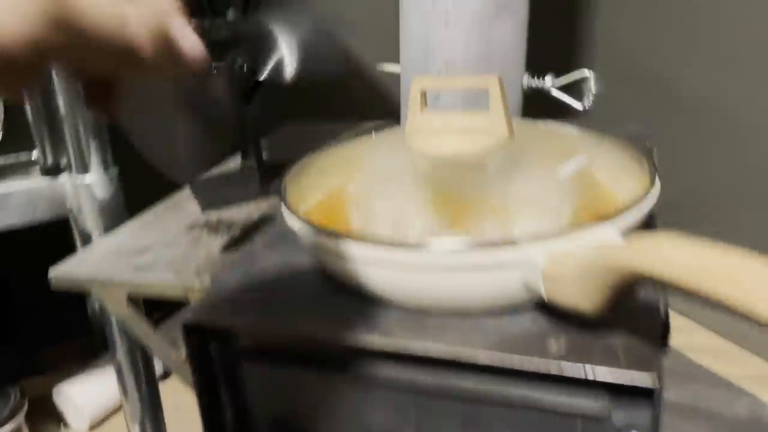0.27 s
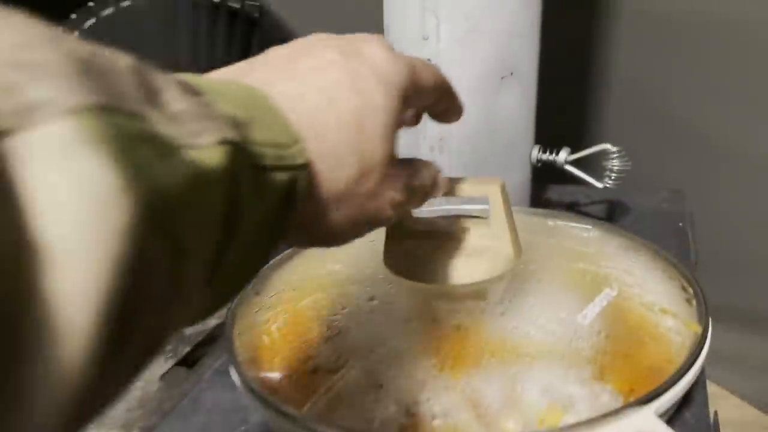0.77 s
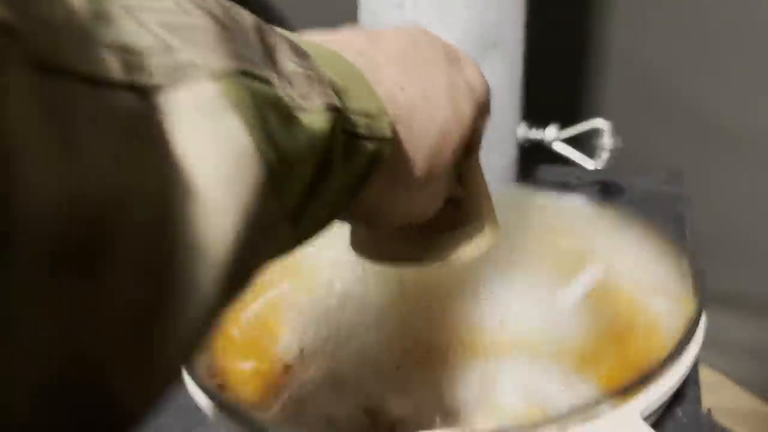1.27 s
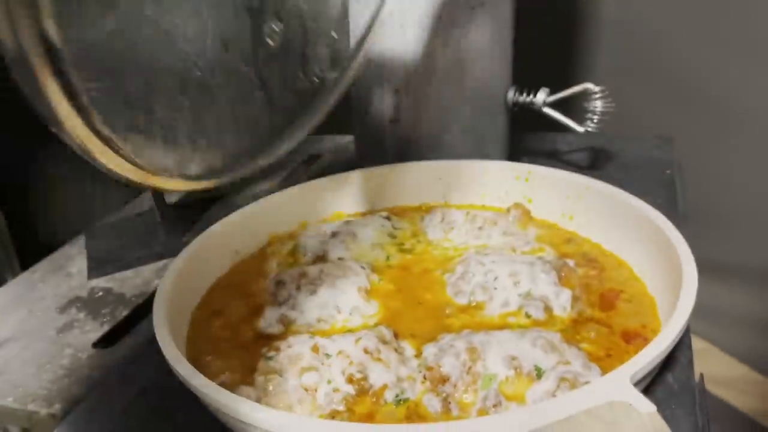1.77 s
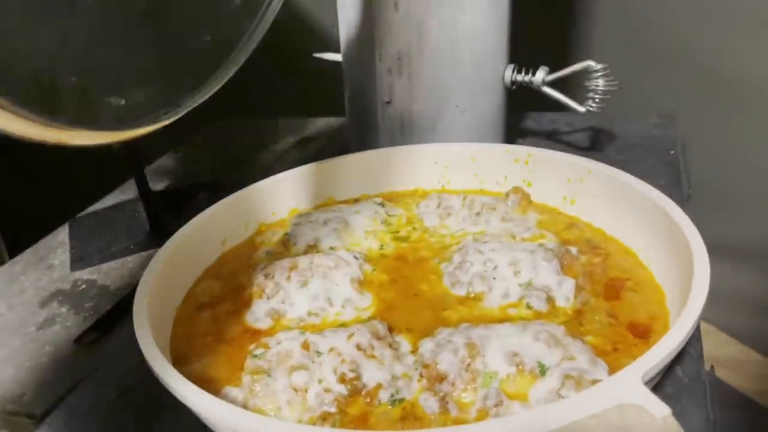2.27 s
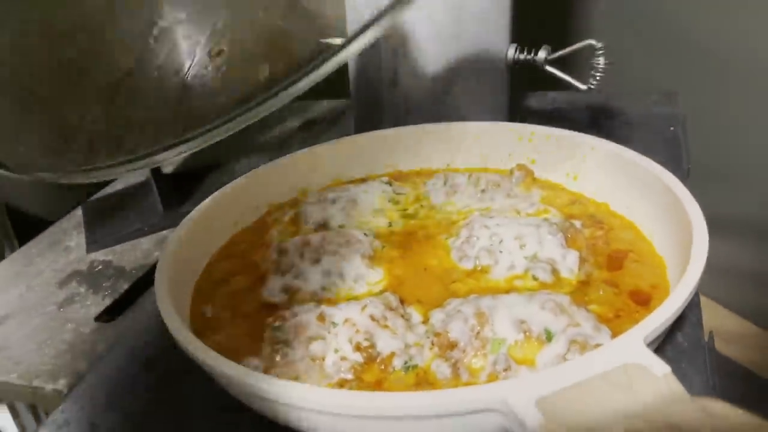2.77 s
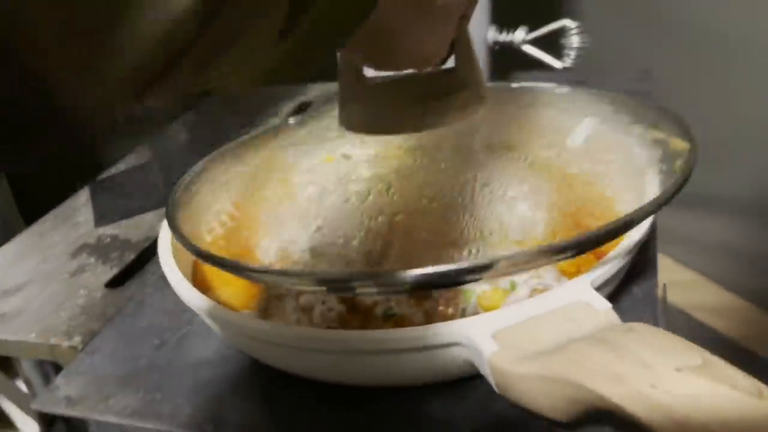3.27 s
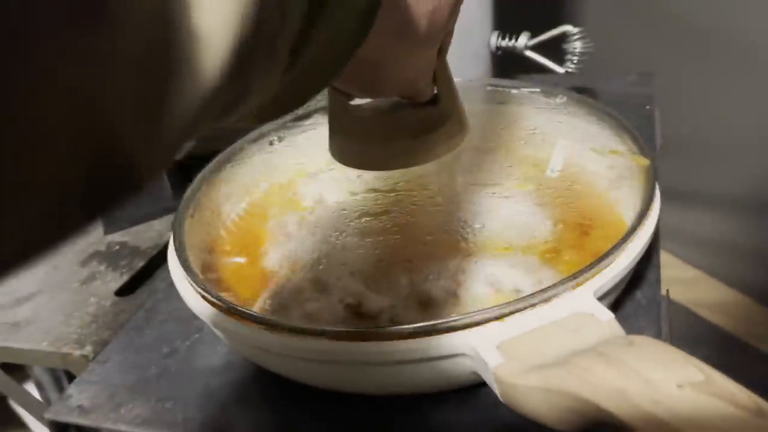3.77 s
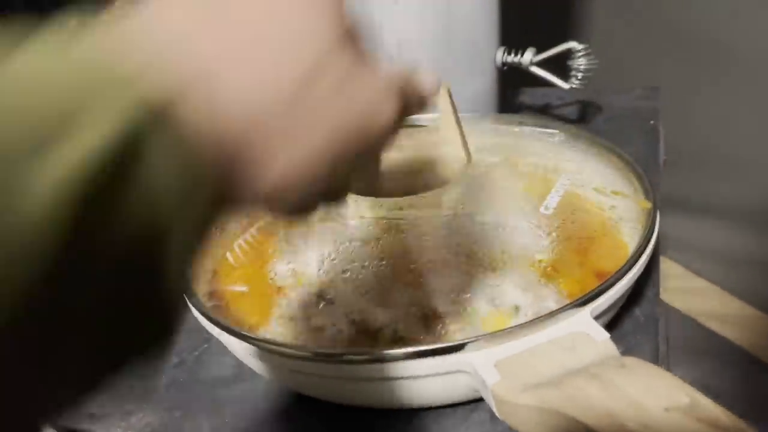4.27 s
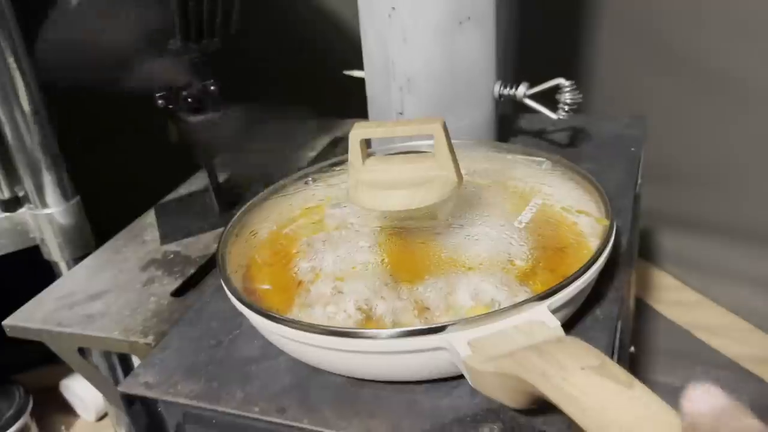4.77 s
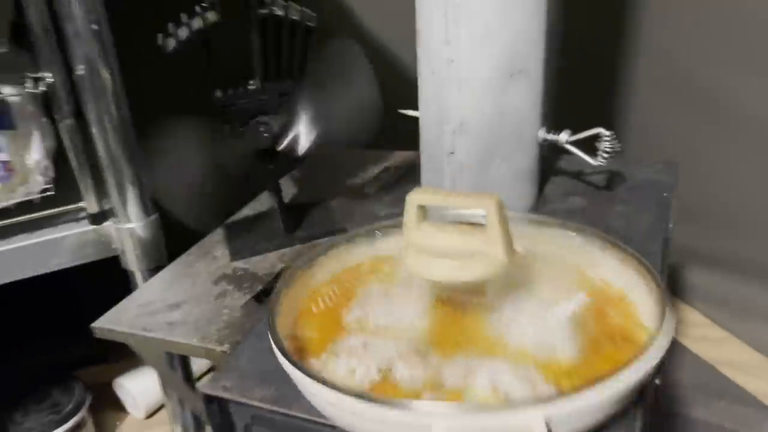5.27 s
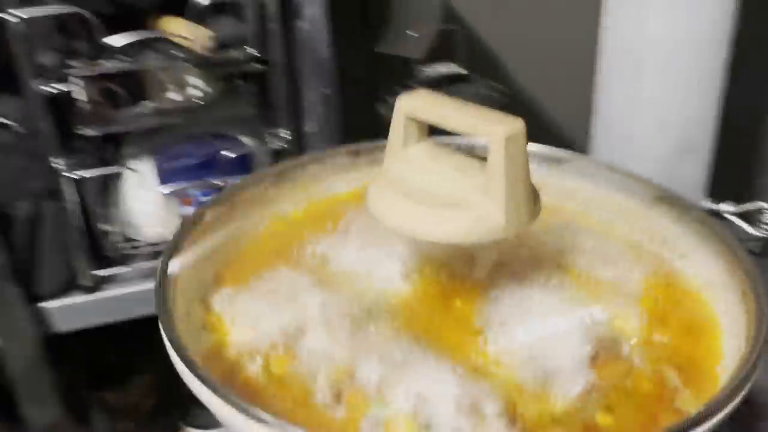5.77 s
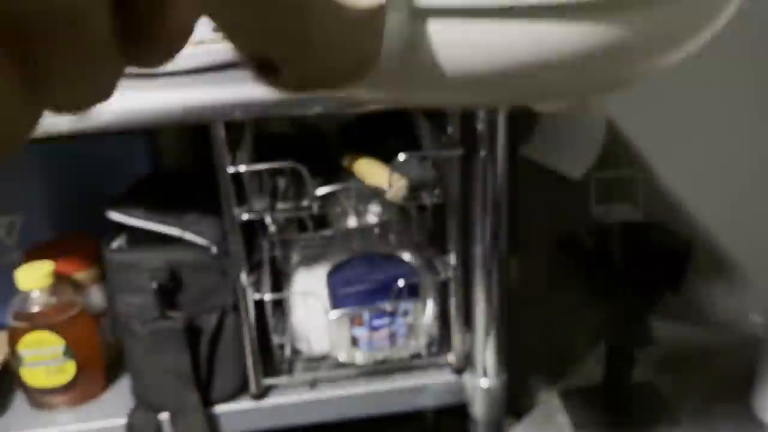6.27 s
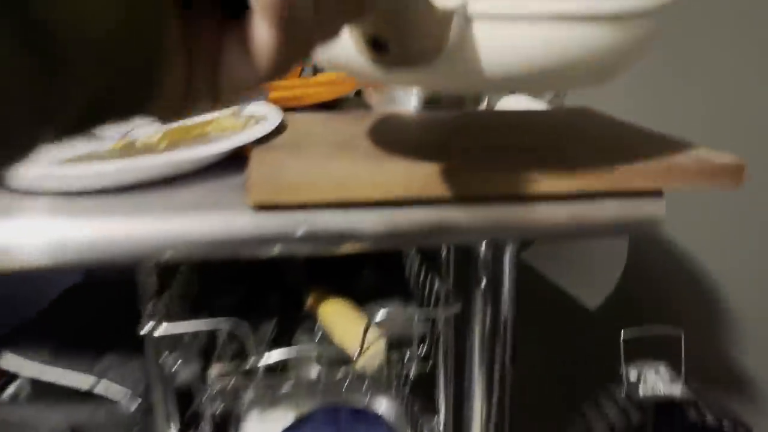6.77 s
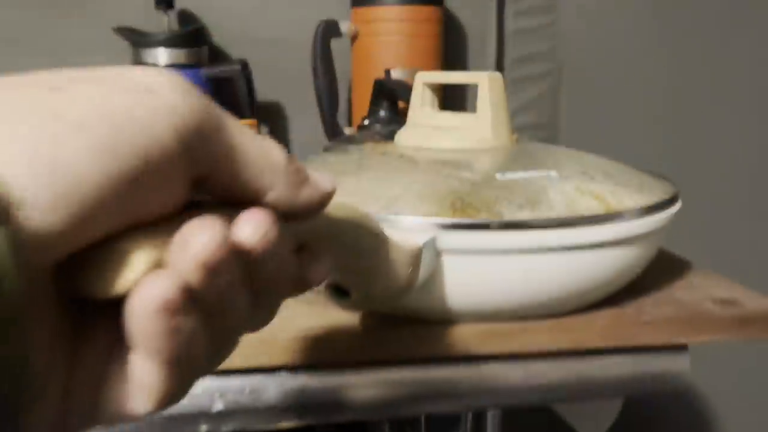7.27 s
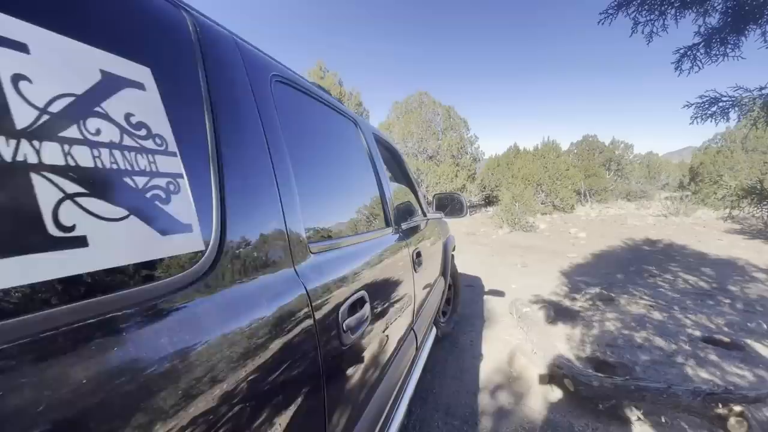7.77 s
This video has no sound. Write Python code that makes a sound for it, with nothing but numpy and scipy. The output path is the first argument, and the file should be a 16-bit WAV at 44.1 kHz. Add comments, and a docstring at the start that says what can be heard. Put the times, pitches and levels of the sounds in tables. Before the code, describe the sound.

In a small, close room, food sizzles faintly in a covered pan. The glass lid lifts with a soft rub and crisp bubbles pop and crackle. The lid scrapes and knocks back into place, the pan slides briefly off a metal stove, and lands hard on a wooden board. A hard cut leads outdoors to a steady idling engine close by.

```python
"""A small room with a stove: eggs sizzle in a pan as steam hiss and bursting bubbles. A hand lifts the
glass lid, sets it back with knocks and rubs, slides the pan off the stove and sets it down hard on a board.
Blows ring tables of modes; rubbing is uneven friction on resonances. An abrupt cut then leads outdoors, beside
an idling engine: exhaust pulses and a beating accessory hum as steady tones, a throbbing roar and valve taps."""
import sys
import numpy as np
from scipy import signal
from scipy.fft import rfft, irfft, next_fast_len
from scipy.io import wavfile
from scipy.ndimage import uniform_filter1d

SR = 44100
rng = np.random.default_rng(int(sys.argv[2]) if len(sys.argv) > 2 else 0)


def log_audio(samples):
    """Write samples as a 16-bit WAV file to the path given in sys.argv[1]."""
    # one column per channel
    frames = np.atleast_2d(samples).T
    # limit to full scale, then quantise
    limited = np.clip(frames, -1, 1)
    pcm = np.round(limited * 32767).astype(np.int16)
    wavfile.write(sys.argv[1], SR, pcm)


N = 353946

# spectrum of the steam hiss: pitch_hz [Hz], level_db [dB per Hz]
HISS_SPECTRUM = [(880, -46.5), (1500, -13), (2360, -5), (2750, -6.5), (4020, -18.5), (4810, -9.5),
                 (8350, -2), (9310, -3.5), (10400, -10), (11400, -6), (13000, -58.5)]
# left-right likeness of the hiss: pitch_hz [Hz], likeness [0-1]
HISS_LIKENESS = [(60, 0.93), (180, 0.94), (550, 0.81), (1650, 0.7), (4970, 0.079), (15000, 0.5)]
# the largest bursting bubbles: start_s [s], level_db [dB], pitch_hz [Hz], left_right_db [dB]
LARGE_POPS = [(1.259, -38.5, 8400, 4), (1.2982, -30.5, 6600, 12), (1.377, -20.5, 4900, 2),
              (1.384, -34, 3050, -2), (1.399, -35, 4450, -1), (1.415, -29, 5800, 3), (1.438, -29, 9050, 2),
              (1.4587, -34.5, 4530, 1), (1.468, -35, 8300, 0.5), (1.4832, -28.5, 9200, -5),
              (1.4828, -36, 5270, 3), (1.507, -40, 5400, 2), (1.5314, -31, 9250, -8),
              (1.6384, -33.5, 8000, 3), (1.63, -47, 3150, 1), (1.7095, -40, 6230, 2.5),
              (1.711, -33, 9250, -1), (1.716, -41, 2960, 1), (1.728, -35.5, 6900, 2),
              (1.7467, -39, 5860, 2), (1.759, -38, 3100, 0.5), (1.8693, -41, 2820, 1),
              (1.8802, -38, 4380, 1.5), (1.943, -34, 8500, 2), (1.954, -45, 4300, 1),
              (1.8425, -33, 8200, 4), (1.9213, -29, 7400, 3), (2.0165, -35, 7300, 4),
              (1.6495, -34, 8700, 1), (1.609, -36, 8800, 1), (1.852, -35, 8800, 2), (1.869, -46, 5000, 1),
              (2.0655, -39, 6500, 2), (2.571, -36, 7600, 2), (2.585, -40, 2980, 1), (2.606, -40, 2700, 1),
              (2.626, -37, 7500, 2), (2.752, -35, 4500, 2), (2.792, -37, 3400, 1), (1.42, -29, 9200, 2),
              (1.423, -37, 4900, 1), (2.0154, -41, 4770, 2), (2.0359, -39.5, 3230, 2),
              (2.0797, -29.5, 8200, 2), (2.1977, -41, 4790, 14), (2.3237, -19, 4880, 5.5),
              (2.3925, -38, 2850, 0), (2.483, -26.5, 8100, 3), (2.3846, -37, 5800, 0.5),
              (2.502, -36, 5920, 4.5), (2.568, -36, 5840, 1.5), (2.522, -33, 5500, 9),
              (2.5943, -35, 4700, 5), (2.6634, -27.5, 7460, 3.5), (2.7023, -23, 5260, 6),
              (2.735, -28, 6200, 4), (2.7633, -18, 6350, 2), (2.807, -24.5, 7500, 4),
              (2.8313, -32, 8610, 4), (2.9817, -46, 5270, -0.5), (2.9997, -39.5, 3190, -3),
              (3.073, -36, 7700, 1.5), (3.1878, -33, 8910, 0), (3.2008, -33, 6000, 3),
              (3.3035, -37, 7650, 4)]
# steam squeaking out of a bubble: start_s [s], length_s [s], level_db [dB], from_hz [Hz], to_hz [Hz],
# left_right_db [dB]
STEAM_SQUEAKS = [(1.836, 0.0074, -43, 2800, 4930, 1), (2.002, 0.016, -39, 9600, 7000, 2),
                 (2.14, 0.011, -50, 1990, 5000, 1)]
# the lid starts to lift, is fully open, starts to close, is shut [s]
LID_S = (1.101, 1.45, 2.8, 3.5)
SHUT_DB, OPEN_DB = -60.5, -52.5  # sizzle under the shut and the open lid
WARMING_DB_PER_S, COOLING_DB_PER_S, COOLING_S = 1.5, -1.5, 3.74  # swell while open; the pan cools from 3.74 s
# the sizzle swells when the sauce is jolted: start_s of the peak [s], rise_db [dB]
SLOSHES = [(5.7, 3.6), (7.33, 10.9)]
SWELL_S, SETTLE_S = 0.16, 0.28
POP_CYCLES = 4.66  # time scale of a large pop, in cycles
POP_SNAP_DB, SNAP_GROWTH = -4, 0.13  # snap of a pop at -27 dB [dB], and its growth [dB per dB]


def sizzle():
    """Bubble acoustics: broadband steam noise, random and large bursts, and squeaks, as the lid opens and shuts."""
    t = np.arange(N) / SR
    gap = np.interp(t, LID_S, [0, 1, 1, 0])
    open_rise_db = OPEN_DB - SHUT_DB + WARMING_DB_PER_S * (t - LID_S[1])
    level_db = SHUT_DB + gap * open_rise_db + COOLING_DB_PER_S * np.maximum(t - COOLING_S, 0)
    slosh_db = sum(np.interp(t, [s - SWELL_S, s, s + SETTLE_S], [0, db, 0]) for s, db in SLOSHES)
    level = amp(level_db + slosh_db)
    hiss = noise(HISS_SPECTRUM, HISS_LIKENESS, patchy_db=2, flicker_db=1.5)
    opened = np.clip(.015 + 1.1 * gap ** 1.8, 0, 1)
    bubbles = crackle(opened) * level * amp(3.5)
    for s, db, hz, pan_db in LARGE_POPS:
        snap_db = POP_SNAP_DB + SNAP_GROWTH * (db + 27.0)
        add(bubbles, s, amp(db) * bubble(hz, POP_CYCLES, 0.028, snap_db), pan_db)
    for s, length, db, from_hz, to_hz, pan_db in STEAM_SQUEAKS:
        add(bubbles, s, amp(db) * squeak(length, from_hz, to_hz), pan_db)
    bubbles = band(bubbles, 1700, 16000)  # small bubbles radiate no bass
    steam = amp(-3.5 * opened)  # the hiss gives way to crackle as the lid opens
    return level * steam * hiss + bubbles + amp(-12) * walls(bubbles, .05, 10000)


def crackle(opened):
    """Random point process: bursts of 20 bubble kinds come in flurries, more densely as the lid opens."""
    clumps = amp(3.5 * evened(uniform_filter1d(rng.standard_normal(N), size=1500)))
    strength = amp(4.3 * np.minimum(rng.exponential(1, N), 3.4))
    bursts = strength * (rng.random(N) < 1100 * opened * clumps / SR)
    kind, out = rng.integers(0, 20, N), np.zeros((2, N))
    for k, (pitch, length, side) in enumerate(rng.random((20, 3))):
        hz = 1900 * 5.1 ** (((k + pitch) / 20) ** .5)
        grain = (hz / 9000) ** .9 * bubble(hz, 1 + 4 * length ** 3, glide=.06, snap_db=-5)
        add(out, 0, signal.oaconvolve(bursts * (kind == k), grain), 1.9 + 8 * (side - .5))
    return out


def bubble(hz, cycles, glide, snap_db):
    """Damped oscillator: a brief snap, and a short tone whose pitch rises when glide is positive."""
    t = np.arange(int(3 * cycles / hz * SR) + 40) / SR
    u = t * hz / cycles
    snap = np.exp(-t / .00022) * 1.3 * np.sin(2 * np.pi * .85 * hz * t)
    chirp = u * np.exp(1 - 2.31 * u) * 1.79 * np.sin(2 * np.pi * hz * t * (1 + glide * u))
    return chirp + amp(snap_db) * snap


def squeak(length, from_hz, to_hz):
    """Frequency modulation: a short unsteady whistle slides from one pitch to another."""
    u = np.arange(int(length * SR)) / (length * SR)
    jitter = 1 + .06 * evened(uniform_filter1d(rng.standard_normal(len(u)), size=60))
    hz = (from_hz + (to_hz - from_hz) * u) * jitter
    return np.sqrt(np.sin(np.pi * u)) * np.sin(2 * np.pi * np.cumsum(hz) / SR)


# blows on lid, stove and board: start_s [s], level_db [peak dB], thud_db and click_db [dB against the middle
# of the sound], ring [factor on the ring time], low_hz and middle_hz [Hz, favoured by the spot of contact]
LID_BLOWS = [(1.038, -41.5, -9, 1, 0.93, 190, 1060), (3.531, -22.5, 17, 15.5, 0.47, 290, 590),
             (3.553, -24.5, -11, 13, 1, 210, 760), (3.569, -24, -1, -5, 0.36, 190, 600),
             (3.82, -22.5, 4.5, -22, 0.44, 275, 520), (3.865, -20, 9.5, -4, 0.3, 330, 510),
             (3.888, -7, -1, -13.5, 0.35, 320, 560), (3.953, -17.5, 13, -4.5, 0.45, 250, 510),
             (3.971, -16.5, 17, -23, 0.58, 285, 780), (3.996, -11, -3, -13, 0.58, 255, 825),
             (4.029, -28.5, 1, -32, 0.98, 190, 800)]
STOVE_BLOWS = [(0.095, -40, 4, -26, 0.38, 190, 650), (0.892, -43, 25, 6, 0.2, 180, 530),
               (0.899, -39, 30, 5, 0.3, 99, 650), (1.149, -41, 24, 5, 0.32, 180, 650),
               (1.259, -36, 30, 15, 0.47, 270, 650), (3.549, -21, 31, -9.5, 0.41, 100, 650),
               (4.2815, -29.5, 8, -23, 0.26, 270, 650), (4.806, -17.5, 8, -10, 1, 268, 676),
               (4.852, -32.5, 24, -10, 0.29, 99.8, 701), (4.874, -33, 21, -10, 0.35, 100, 701),
               (5.063, -34, 18, -4, 0.13, 320, 650), (5.348, -28, 5, -7, 0.57, 310, 620),
               (5.354, -17, 9, -21, 0.28, 173, 520), (5.436, -42.5, -5, -19, 0.4, 270, 850),
               (5.505, -42, 28, 3, 0.48, 220, 647), (6.077, -45, 4, -6, 0.47, 270, 1020)]
PAN_ON_BOARD = [(7.1192, -4.5, -8, -4.5, 0.13, 375, 990), (7.1228, -3, -6.5, -9, 0.17, 190, 880),
                (7.1275, -7.5, -5, -17, 0.24, 160, 1010), (7.141, -7, 6.5, -2, 0.23, 190, 1000),
                (7.149, -12.5, 8, -13, 0.19, 350, 620), (7.163, -23, 6, -12, 0.3, 370, 650),
                (7.175, -25, 0, -9, 0.3, 290, 630), (7.185, -23.5, -5, -16, 0.33, 125, 1000),
                (7.194, -19, 2.5, -20, 0.19, 200, 970), (7.208, -22.5, -0.5, -17, 0.18, 380, 600),
                (7.226, -34, 8, -20, 0.28, 200, 630), (7.244, -37.5, 14, -10, 0.3, 170, 620),
                (7.286, -39, 17, -12, 0.18, 260, 860)]
# modes of the lid on the pan, the stove and the board: pitch_hz [Hz], level_db [dB], t60_s [s]
LID_MODES = [(71, -11, 0.5), (194, -5, 0.26), (258, 3.5, 0.11), (287, 7.5, 0.088), (324, 7, 0.093),
             (376, -7, 0.12), (507, -0.5, 0.12), (584, 1.5, 0.088), (760, -10, 0.16), (834, 7, 0.089),
             (1060, 6, 0.07), (1323, -8, 0.25), (1700, -5, 0.066), (1931, -11.5, 0.21), (2355, -16, 0.11),
             (2753, -9, 0.14), (3100, -10, 0.059), (3730, -2, 0.071), (4300, 0.5, 0.038),
             (5020, -6.5, 0.059), (8710, -6, .04)]
STOVE_MODES = [(75, -9, 0.2), (99, -1.5, 0.29), (179.5, 7, 0.13), (269, 8, 0.128), (322, -1.5, 0.083),
               (530, -1.5, 0.11), (653, -2, 0.14), (750, -3, 0.14), (850, -3, 0.08), (1020, -3, 0.082),
               (1430, -21, 0.06), (2300, -7, 0.04), (4400, -7, 0.046), (8100, -26, .04)]
BOARD_MODES = [(70.4, -19, 0.22), (121.2, -5, 0.3), (185, 4.5, 0.28), (290, -2, 0.2), (365, 3, 0.26),
               (500, -7.5, 0.2), (625, 1, 0.36), (885, -2, 0.2), (1005, 1, 0.31), (1270, -9.5, 0.15),
               (1560, -8, 0.15), (1830, -11, 0.2), (2165, -5.5, 0.12), (2356, -4.5, 0.16),
               (2440, -6.5, 0.16), (2750, -5, 0.12), (3200, -3.5, .12), (3420, -4, .12), (3770, -8, 0.1),
               (4460, -10.5, 0.1), (5000, -11, .1), (6220, 0, 0.1)]


def handling():
    """Impact and friction: blows ring the bodies, snaps add sharp pulses, and dragging and sliding sustain."""
    hits = blows(LID_BLOWS, LID_MODES, -8, 0.2, 0.74, upper_db=-1.5, share=0.37, pan_db=1.5)
    hits += blows(STOVE_BLOWS, STOVE_MODES, -7.0, 0.11, 0.95, upper_db=-1.0, share=0.37, pan_db=0.5)
    hits += blows(PAN_ON_BOARD, BOARD_MODES, 2.6, 0.21, 0.83, upper_db=6.5, share=0.59, pan_db=0.9)
    hits += snaps()
    rasp = rim_rasp()
    return band(hits, 55, 16000) + lid_drags(rasp) + pan_slide(rasp) + pan()


# the four bands of a blow: from_hz [Hz], to_hz [Hz], rise_s [s]
BLOW_BANDS = [(50, 500, .003), (500, 1300, .001), (1300, 3000, .0005), (3000, 10000, .0002)]
FAVOUR_DB_PER_OCTAVE = 9.5


def blows(rows, modes, crack_db, crack_s, spread, upper_db, share, pan_db):
    """Modal synthesis: each blow rings the modes with a noise crack; bass swells slower and is more alike."""
    out = np.zeros((2, N))
    for s, peak_db, thud_db, click_db, ring, *spots in rows:
        levels_db = thud_db, 0, upper_db + share * click_db, click_db
        phases, (a, b), sound = rng.random((len(modes), 2)), rng.standard_normal((2, 9000)), 0
        t = np.arange(min(9000, int(1500 + 11000 * ring))) / SR  # longer for a longer ring
        for db, (lo, hi, rise) in zip(levels_db, BLOW_BANDS):
            apart = spread * min(hi / 3200, 1)  # left-right phase spread
            tone = 0
            for (hz, mode_db, t60), (p, q) in zip(modes, phases):
                if lo < hz <= hi:
                    decay = amp(mode_db - off_db(hz, spots) - 60 * t / (ring * t60))
                    offset = np.array([[0], [apart * (q - .5)]])
                    tone = tone + decay * np.sin(2 * np.pi * (hz * t + p + offset))
            stereo = np.array([a, np.cos(apart) * a + np.sin(apart) * b])[:, :len(t)]
            crack_t60 = crack_s * ring * (500 / lo) ** 0.3
            crack = evened(band(stereo, lo, hi)) * amp(crack_db - 60 * t / crack_t60)
            part = (tone + crack) * (1 - np.exp(-t / rise))
            loudest = np.sqrt(uniform_filter1d(part[0] ** 2, size=400).max())
            sound = sound + amp(db) * part / loudest
        # every blow sounds 1.2 ms after its start_s
        add(out, s + .0012, sound * amp(peak_db) / abs(sound).max(), pan_db)
    return out


def off_db(hz, spots):
    """Mode coupling: low modes far from the pitches that a blow favours are struck more weakly [dB]."""
    if hz > BLOW_BANDS[1][1]:
        return 0
    return FAVOUR_DB_PER_OCTAVE * min(abs(np.log2(hz / np.array(spots))))


# short hard snaps of handles, lid and board, and one low pop or drip at 2.806 s: start_s [s],
# level_db [peak dB], from_hz [Hz], to_hz [Hz], snap_db [dB against its tail], t60_s [s], left_right_db [dB]
HARD_SNAPS = [(0.0985, -44, 300, 1900, 8, .04, 0), (2.806, -29, 500, 2380, 8, 0.027, 2),
              (3.889, -19, 2080, 2900, 5, .05, 2), (3.9974, -21.5, 2500, 3200, 2, 0.077, 1.5),
              (4.128, -22.5, 6700, 9600, 0, 0.03, 2), (4.2815, -13, 700, 9800, 14.5, .035, 3),
              (4.42, -36.5, 600, 6000, 6, 0.028, 3), (5.1205, -21, 2500, 10000, 2, .04, 1),
              (6.354, -46, 3500, 10000, 3, 0.044, 0), (6.824, -49, 5000, 7600, 3, .04, 0),
              (7.038, -37, 6600, 8700, 2, 0.046, 1), (7.1202, -7, 1900, 4430, -3, 0.026, 2),
              (7.1225, -4, 2100, 3000, -3, 0.03, 2)]
SNAP_ECHO_S = .00055
SNAP_SPILL_DB = -17.5  # what a snap spreads outside its own band


def snaps():
    """Impulse excitation: a sharp pulse, one reflection and a dying rattle, strongest in one band."""
    out, t = np.zeros((2, N)), np.arange(4000) / SR
    for s, peak_db, lo_hz, hi_hz, snap_db, t60, pan_db in HARD_SNAPS:
        a, b = rng.standard_normal((2, 4000))
        drive = np.array([a, 0.74 * a + .44 * b]) * amp(-60 * t / t60)
        drive[:, 0] = 3 * amp(snap_db)
        drive[:, round(SNAP_ECHO_S * SR)] += 1.4 * amp(snap_db)  # thrown back by the nearest surface
        sound = band(drive, lo_hz, hi_hz) + amp(SNAP_SPILL_DB) * band(drive, 400, 10000)
        add(out, s, sound * amp(peak_db) / abs(sound).max(), pan_db)
    return out


# bands that sing while the lid drags: pitch_hz [Hz], width_hz [Hz], level_db [dB]
RIM_BANDS = [(655, 30, 0.5), (1147, 46, 5.5), (1950, 64, -2), (2170, 80, -8), (2430, 40, -5), (2770, 56, 2),
             (3190, 95, 3), (3570, 40, -4), (3800, 40, 0), (4150, 160, -2), (4800, 150, -6)]


def rim_rasp():
    """Stick-slip friction: the rim resonances sing unevenly as the grip stutters."""
    rasp = whistling(RIM_BANDS)
    return evened(rasp * amp(4.7 * evened(uniform_filter1d(rng.standard_normal(N), size=250))))


# the lid drags on the rim, one list lifting and one seating: start_s [s], level_db [groan dB], pitch_hz [Hz]
LID_DRAGS = [
    [(1.08, -63, 258), (1.104, -53, 300), (1.135, -58, 280.2), (1.19, -59, 210.5), (1.23, -48.5, 200.2),
     (1.27, -48, 290), (1.31, -54, 251), (1.36, -57, 236)],
    [(3.53, -42, 212), (3.562, -38, 185), (3.595, -37.5, 290), (3.624, -41.5, 280), (3.668, -41.5, 190),
     (3.708, -34.5, 190), (3.738, -33, 199.9), (3.755, -34.5, 340), (3.78, -32.5, 345), (3.802, -37, 320),
     (3.856, -38.5, 290), (3.894, -31.5, 329.3), (3.932, -37, 200.3), (3.97, -31.5, 285.3),
     (4.015, -31, 253.3), (4.078, -44.5, 259.8), (4.25, -55, 300.6)],
]
RASP_DB, RASP_GROWTH = -44, 1.47  # rasp at a groan of -30.5 dB [dB], and its growth [dB per dB]
BOOM_DB, BOOM_T60 = -6, 0.9  # boom against the groan [dB], and its decay [s]


def lid_drags(rasp):
    """Friction coupling: the dragging lid rumbles and rasps, and the stove body booms along."""
    rumble = rubbed(LID_MODES, 0.85, 150, 650, lumpy_db=8.5)
    shake = evened(band(rng.standard_normal(N), 65, 132))
    return sum(dragged(rows, rumble, rasp, shake) for rows in LID_DRAGS)


def dragged(rows, rumble, rasp, shake):
    """Nonlinear friction: the groan follows the drag, the rasp rises more steeply, and the boom lingers."""
    t = np.arange(N) / SR
    level = curve(rows, 1)
    active = t < rows[-1][0] + 1
    sink = amp(60 * (t - rows[0][0]) / BOOM_T60 * active)
    linger = np.maximum.accumulate(level * sink) / sink * active  # peak hold with a steady decay
    voice = 0.24 * rumble + 0.83 * band(groan(rows, 41), 122, 950)
    rasp_level = amp(RASP_DB) * (level / amp(-30.5)) ** RASP_GROWTH
    return voice * level + rasp * rasp_level + shake * amp(BOOM_DB) * linger


# spectrum of the scrape over the stove top: pitch_hz [Hz], level_db [dB per Hz]
SCRAPE_SPECTRUM = [(350, -22), (600, -12), (1190, -7.5), (1490, -16), (1850, -8.5), (2070, -13.5),
                   (3160, -9.5), (4110, -11.5), (8050, -10.5), (11500, -10.5), (13400, -27), (14500, -40),
                   (16000, -48)]
# groan of the sliding pan: start_s [s], level_db [dB against the rumble], pitch_hz [Hz]
PAN_GROAN = [(5.08, -8, 322), (5.17, -3.5, 369.3), (5.24, 0, 315), (5.34, -4, 323)]
SLIDE_START_S, SLIDE_FASTEST_S, SLIDE_END_S = 4.98, 5.188, 5.34
# level at the fastest [dB], rise [dB per s], fall [dB per s]
RUMBLE, SCRAPING = (-38, 104, 51), (-27, 173, 420)


def pan_slide(rasp):
    """Sliding friction: scrape, rumble and groan grow as the pan speeds up and sink as it lifts off."""
    middle_s = (SLIDE_START_S + SLIDE_END_S) / 2
    touching = abs(np.arange(N) / SR - middle_s) < (SLIDE_END_S - SLIDE_START_S) / 2
    scrape = noise(SCRAPE_SPECTRUM, [(500, 0.83), (9000, 0.46)], patchy_db=1.5, flicker_db=2.0)
    scrape = scrape + amp(-15.0) * band(rasp, 1250, 5200)  # the pan sings a little
    rumble = 0.68 * rubbed(STOVE_MODES, 0.71, 60, 900, lumpy_db=3.5)
    rumble = rumble + groan(PAN_GROAN, 30) * curve(PAN_GROAN, 1)
    slide = scrape * amp(peaked(SLIDE_FASTEST_S, *SCRAPING))
    slide = slide + rumble * amp(peaked(SLIDE_FASTEST_S, *RUMBLE))
    return slide * touching


def groan(rows, width_hz):
    """Stick-slip oscillation: an unsteady tone glides through the rows, with friction noise around it."""
    rows = np.array(rows)
    hz = np.interp(np.arange(N) / SR, rows[:, 0], rows[:, 2])
    turn, r = np.exp(2j * np.pi * np.cumsum(hz) / SR), np.exp(-np.pi * width_hz / SR)
    wobble = np.exp(1j * 0.85 * evened(uniform_filter1d(rng.standard_normal(N), size=600)))
    # noise shifted down, smoothed and shifted back: a resonance that follows the glide
    fuzz = evened((turn * signal.lfilter([1 - r], [1, -r], rng.standard_normal(N) / turn)).real)
    return evened(1.2 * (turn * wobble).real + 0.55 * fuzz)


def rubbed(modes, damping, lo_hz, hi_hz, lumpy_db):
    """Forced vibration: uneven friction noise keeps the modes of one band ringing."""
    t, body = np.arange(4096) / SR, 0
    for hz, db, t60 in modes:
        if lo_hz < hz < hi_hz:
            body = body + amp(db - 60 * t / (damping * t60)) * np.sin(2 * np.pi * hz * t)
    lumps = evened(uniform_filter1d(rng.standard_normal(N), size=300))
    grip = rng.standard_normal(N) * amp(lumpy_db * lumps)
    return evened(signal.oaconvolve(grip, body)[:N])


# modes of the pan body settled on the board: pitch_hz [Hz], level_db [dB], t60_s [s]
PAN_MODES = [(229, -50, 1.2), (853, -58.5, 1.26), (1215, -69, 1.3)]
PAN_S, PAN_SWELL_S = 7.23, .07


def pan():
    """Free vibration: the settled pan hums faintly in a few long modes."""
    out, t = np.zeros((2, N)), np.arange(SR) / SR
    hum = sum(amp(db - 60 * t / t60) * np.sin(2 * np.pi * hz * t) for hz, db, t60 in PAN_MODES)
    add(out, PAN_S, hum * np.minimum(t / PAN_SWELL_S, 1), 0.8)
    return out


# engine orders: exhaust pulses, and a beating accessory hum near 380 Hz: order [multiple of the cycle rate],
# level_db [dB rms]
ENGINE_ORDERS = [(3, -45), (4, -36), (5, -21), (6, -36), (7, -30), (8, -32), (9, -39), (10, -28), (12, -42),
                 (13, -47), (15, -43), (16, -48), (17, -42), (18, -32), (19, -41), (20, -47), (24, -48),
                 (25, -48), (28, -51), (36.55, -43), (37.08, -44), (45.6, -50)]
# spectrum of the roar: pitch_hz [Hz], level_db [dB per Hz]
ROAR_SPECTRUM = [(18, -36), (30, -14), (64, -19), (144, -9.5), (189, -4), (270, -14), (323, -30),
                 (384, -19.5), (612, -40.5), (1510, -51.5), (2190, -52), (3480, -59), (9060, -69.5),
                 (10500, -68), (13600, -118), (22000, -120)]
# left-right likeness of the roar: pitch_hz [Hz], likeness [0-1]
ROAR_LIKENESS = [(60, 0.91), (180, 0.39), (550, 0.77), (1650, 0.02), (4970, 0.15), (15000, 0.28)]
# bands that whistle in the engine bay: pitch_hz [Hz], width_hz [Hz], level_db [dB]
BAY_BANDS = [(873, 33, 5.5), (1496, 30, 4.5), (1820, 76, -18), (3480, 200, -14), (4570, 130, -21),
             (6070, 76, -24)]
CYCLE_HZ, FIRING_S = 10.3, 7.802  # five firings a cycle; the time of one firing


def engine():
    """Additive synthesis: steady engine orders, under a roar whose upper part throbs with the firings."""
    turns = (np.arange(N) / SR - FIRING_S) * CYCLE_HZ
    skew = .9  # each pulse falls faster than it rises
    flutter = amp(3 * evened(uniform_filter1d(rng.standard_normal(N), size=900)))
    orders = 0
    for k, db in ENGINE_ORDERS:
        lag = .11 if round(k) % 5 else 0  # exhaust orders between the firing orders come from unequal cylinders
        phase = 2 * np.pi * k * (turns - lag) + skew + k * np.array([[.013], [-.013]])
        orders = orders + amp(db) * np.sqrt(2) * np.cos(phase)
    orders = orders * amp([[-.3], [.3]])
    a, b = rng.standard_normal((N, 2)).T
    low = coloured(np.array([a, .9 * a + .44 * b]), ROAR_SPECTRUM)
    low = amp(-38.5) * evened(band(low, 30, 340))
    throb = 1 + 0.27 * np.cos(2 * np.pi * 5 * turns)
    high = evened(band(noise(ROAR_SPECTRUM, ROAR_LIKENESS, patchy_db=-0.5, flicker_db=0.5), 704, 11500))
    high = high + amp(-7) * flutter * band(whistling(BAY_BANDS), 700, 7000)
    return orders + low + amp(-43) * high * throb + valves()


# short rings of the valve gear on some firings: start_s [s], level_db [dB], pitch_hz [Hz]
VALVE_TAPS = [(7.796, -51, 3900), (7.834, -49, 2300), (7.872, -48, 3550), (7.873, -52, 2550),
              (7.893, -50, 1950), (7.953, -52, 3800), (7.992, -52, 3430), (8.008, -47, 3480)]
TAP_CYCLES = 28  # time scale of a tap, in cycles


def valves():
    """Damped oscillator: each tap rings briefly at its own steady pitch."""
    out = np.zeros((2, N))
    for s, db, hz in VALVE_TAPS:
        add(out, s, amp(db) * bubble(hz, TAP_CYCLES, 0, -6), 0)
    return out


# spectrum of the still air of the room: pitch_hz [Hz], level_db [dB per Hz]
AIR_SPECTRUM = [(15, -36), (25, -7), (65, 5), (103, -7), (162, -3.5), (220, -6), (560, -13.5), (758, -15.5),
                (2030, -24.5), (3370, -28.5), (8580, -13), (9730, -21.5), (10500, -41.5), (13600, -90),
                (22000, -120)]
# left-right likeness of the air: pitch_hz [Hz], likeness [0-1]
AIR_LIKENESS = [(60, 0.76), (180, 0.8), (550, 0.21), (1650, 0.019), (4970, 0.15), (15000, 0.2)]
# the air changes as the stove is left behind: start_s [s], low_level_db and high_level_db [dB, below and
# above about 1 kHz]
AIR_LEVELS = [(0.0, -55.5, -58.5), (1.0, -56.5, -61.5), (5.6, -55.5, -61), (7.0, -62, -65),
              (7.78, -59, -66)]


def air():
    """Filtered noise: a low murmur of stove and room, and a thin upper hush."""
    a, b = rng.standard_normal((N, 2)).T
    low = coloured(np.array([a, 0.89 * a + 0.44 * b]), AIR_SPECTRUM)  # bass is nearly alike in both channels
    low = evened(band(low, 46, 920))
    high = evened(band(noise(AIR_SPECTRUM, AIR_LIKENESS, patchy_db=2.5, flicker_db=1.0), 1000, 4550))
    return low * curve(AIR_LEVELS, 1) + high * curve(AIR_LEVELS, 2)


def walls(x, t60, bright_hz):
    """Reverberation: sparse decaying echoes of random sign, other ones in each channel."""
    taps = np.zeros((2, 14000))
    at = np.arange(150, 13970, 20) + rng.integers(0, 20, (2, 691))
    np.put_along_axis(taps, at, rng.choice([-1., 1.], at.shape), 1)
    taps = band(taps * amp(-60 * np.arange(14000) / SR / t60), 150, bright_hz)
    return signal.fftconvolve(x, taps / np.linalg.norm(taps[0]), axes=1)[:, :N]


def noise(shape, likeness, patchy_db, flicker_db):
    """Short-time spectral synthesis: stereo noise with drifting patches and a flicker shared by all pitches."""
    frames, hz = N // 128 + 5, np.fft.rfftfreq(512, 1 / SR)
    a, b, c, d, patches = rng.standard_normal((frames, 257, 5)).T
    patches = evened(uniform_filter1d(uniform_filter1d(patches, size=6, axis=0), size=24, axis=1))
    flicker = evened(uniform_filter1d(rng.standard_normal(frames), size=3))
    same, left = np.clip(read(likeness, hz), -1, 1)[:, None], a + 1j * b
    right = same * left + np.sqrt(1 - same ** 2) * (c + 1j * d)
    gain = amp(read(shape, hz)[:, None] + patchy_db * patches + flicker_db * flicker)
    frames_lr = np.array([left, right]) * gain
    return evened(signal.istft(frames_lr, nperseg=512, noverlap=384)[1][:, :N])


def whistling(peaks):
    """Resonance: stereo noise passes a few narrow peaks."""
    size = next_fast_len(N)
    hz = np.fft.rfftfreq(size, 1 / SR)
    gain = sum(amp(db) / (1 + 2j * (hz - f) / width) for f, width, db in peaks)
    a, b = rng.standard_normal((N, 2)).T
    return evened(irfft(rfft(np.array([a, .7 * a + .71 * b]), size) * gain, size)[:, :N])


def coloured(x, shape):
    """Linear filtering: weights the spectrum of a sound by a table."""
    size = next_fast_len(N)
    return irfft(rfft(x, size) * amp(read(shape, np.fft.rfftfreq(size, 1 / SR))), size)[..., :N]


def band(x, lo_hz, hi_hz):
    """Linear filtering: a causal band-pass."""
    return signal.sosfilt(signal.butter(3, [lo_hz, hi_hz], "bandpass", fs=SR, output="sos"), x)


def peaked(top_s, top_db, rise, fall):
    """Exponential growth and decay: a level in dB climbs to a peak and sinks, each at a steady rate."""
    late = np.arange(N) / SR - top_s
    return top_db + np.minimum(rise * late, -fall * late)


def curve(rows, column):
    """Level envelope: gain over time from a dB column, silent outside its span."""
    rows = np.array(rows)
    return amp(np.interp(np.arange(N) / SR, rows[:, 0], rows[:, column], left=-200, right=-200))


def read(points, hz):
    """Logarithmic pitch: reads a spectrum on a log-frequency axis."""
    f, value = np.transpose(points)
    return np.interp(np.log(hz + 1), np.log(f + 1), value)


def add(mix, s, sound, pan_db):
    """Level-difference stereo: places a sound in time and between the channels."""
    part = mix[:, round(s * SR):][:, :sound.shape[-1]]
    part += amp([[pan_db / 2], [-pan_db / 2]]) * sound[..., :part.shape[1]]


def evened(x):
    """Energy normalisation: scales to rms 1."""
    return x / np.sqrt(np.mean(x ** 2) + 1e-20)


def amp(db):
    """Logarithmic level: decibels to gain."""
    return 10 ** (np.asarray(db) / 20)


# response of the microphone, dropping steeply above 9.3 kHz: pitch_hz [Hz], level_db [dB]
MICROPHONE_RESPONSE = [(9300, 0), (10200, -17.5), (12000, -15), (13000, -47), (20000, -48.5)]
CUT_S = 7.78782


def scene():
    """Superposition: the kitchen, whose bass rings on longer than its treble, then a hard cut to the engine."""
    near = handling()
    echoes = amp(-15) * walls(near, 0.14, 9800) + amp(-30.5) * walls(near, 0.38, 900)
    kitchen = coloured(near + echoes + sizzle() + air(), MICROPHONE_RESPONSE)
    outdoors = coloured(engine(), MICROPHONE_RESPONSE)
    return np.where(np.arange(N) < CUT_S * SR, kitchen, outdoors)


EDGE_HZ = 16800


def record(dry):
    """Band limitation: a linear-phase low-pass."""
    low_pass = signal.firwin(511, EDGE_HZ, window=("kaiser", 9), fs=SR)
    return signal.oaconvolve(dry, low_pass[None], "same")


dry = scene()
out = record(dry)
log_audio(out)
```